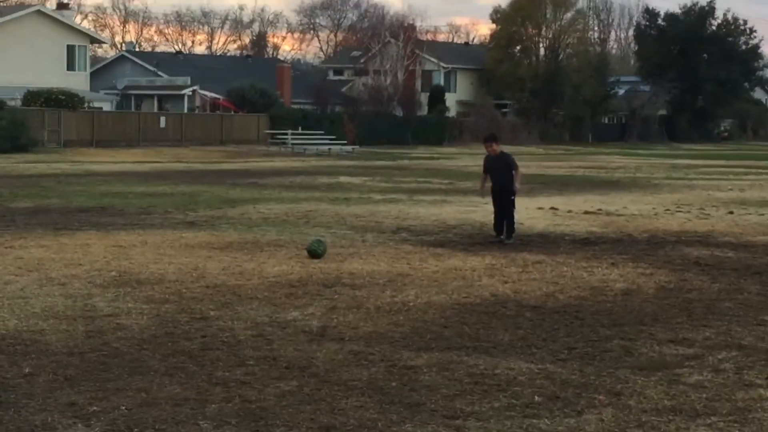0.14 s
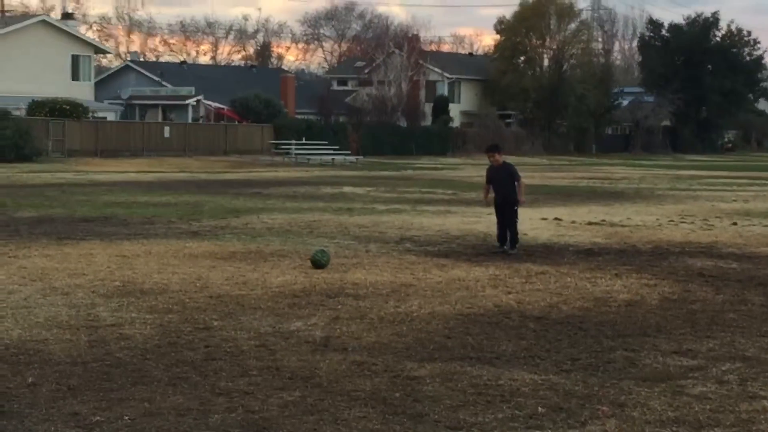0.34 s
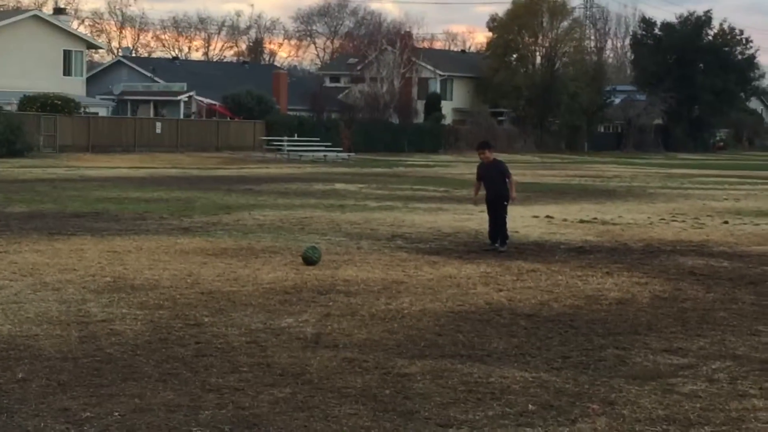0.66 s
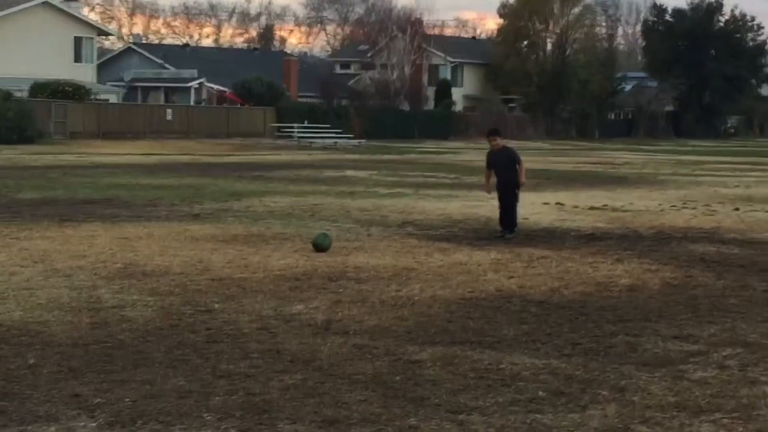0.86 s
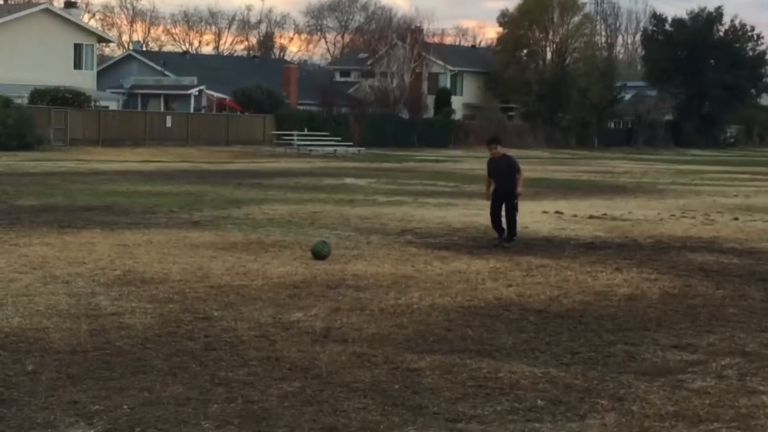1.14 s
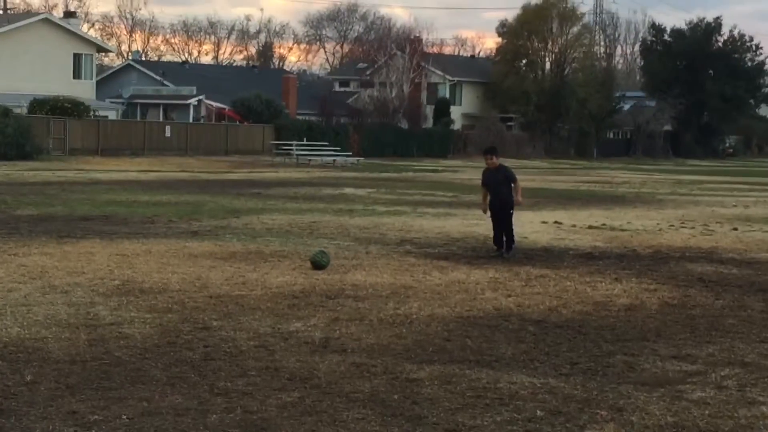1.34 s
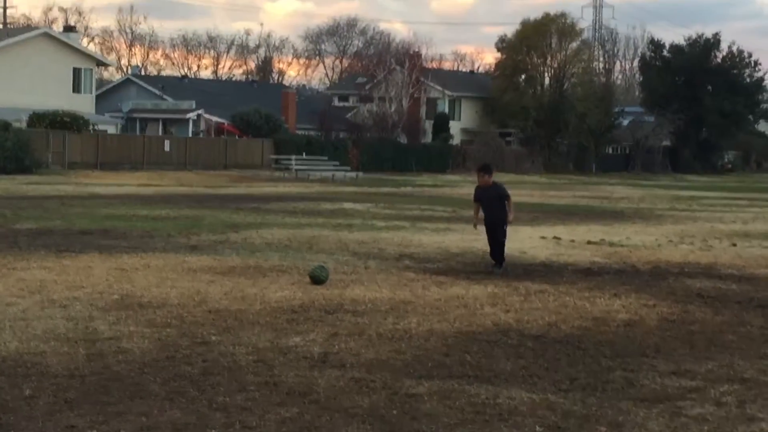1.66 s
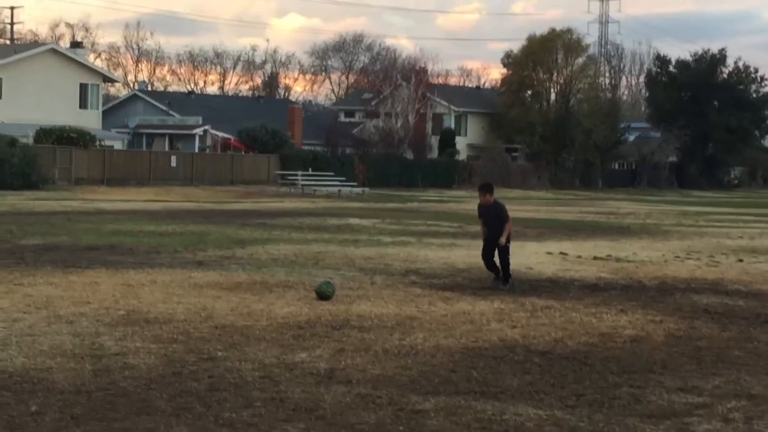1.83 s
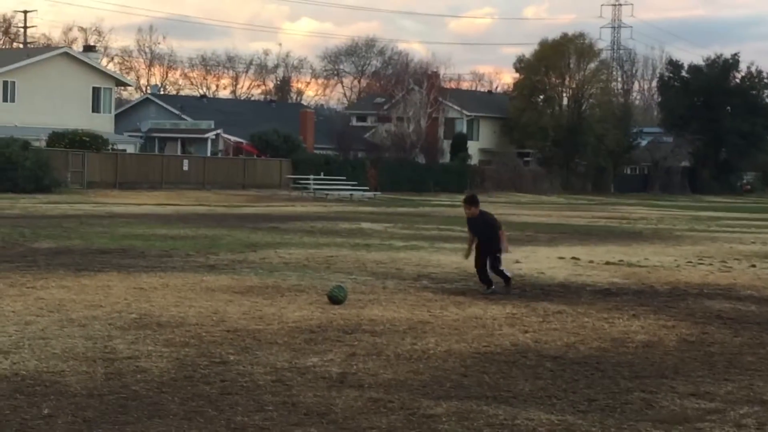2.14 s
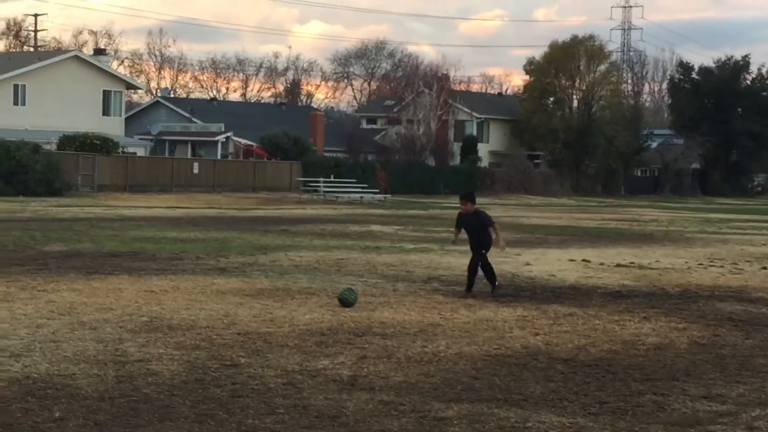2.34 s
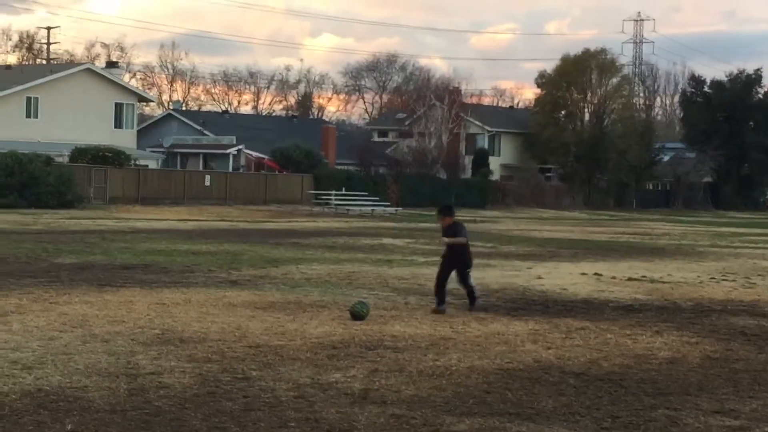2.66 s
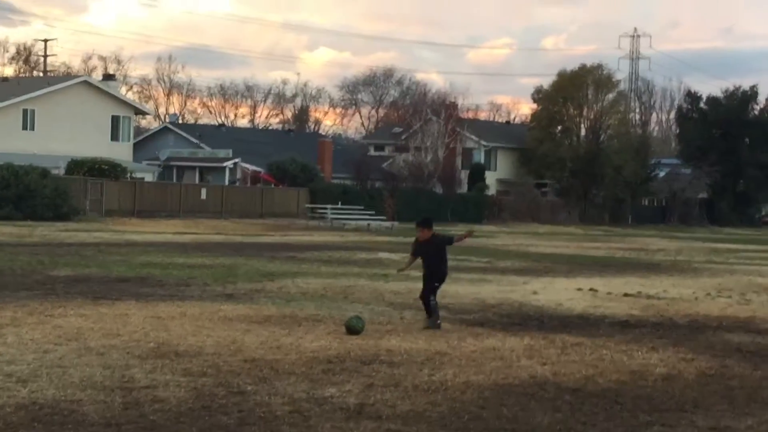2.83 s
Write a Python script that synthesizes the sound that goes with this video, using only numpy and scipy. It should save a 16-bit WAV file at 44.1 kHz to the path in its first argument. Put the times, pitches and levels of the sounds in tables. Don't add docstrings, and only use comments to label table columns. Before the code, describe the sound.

Unsteady mains hum and far-off road rumble outdoors, broken by a single bright crack and short rattle

```python
import sys
import numpy as np
from scipy import signal
from scipy.io import wavfile
from scipy.ndimage import uniform_filter1d

SR = 44100
rng = np.random.default_rng(int(sys.argv[2]) if len(sys.argv) > 2 else 0)


def natural_amplitude(level_db):
    exponent = np.asarray(level_db, float) / 20
    return 10 ** exponent


def pcm_store(signal):
    levels = np.round(np.clip(np.atleast_2d(signal), -1, 1) * 32767)
    wavfile.write(sys.argv[1], SR, levels.astype(np.int16).T)


N = 131859

# t/s, f/Hz, level/dB
HUM_PATH = [(0, 120.7, -34), (0.349, 120.3, -32), (0.387, 120.5, -36), (0.549, 120.1, -35),
            (.62, 121.2, -44), (.77, 118.5, -35), (0.871, 118.8, -45), (.94, 118.3, -34.5),
            (1.37, 120.3, -35.5), (1.419, 119.1, -42), (1.68, 121.5, -35), (1.82, 120.1, -54),
            (2.11, 119.7, -39.5), (2.199, 120.7, -42.5), (2.269, 121.8, -36), (2.57, 119.8, -31),
            (2.71, 119.5, -43.5), (2.745, 119.5, -39), (2.845, 119, -35), (2.885, 118, -66),
            (2.915, 119.6, -53), (2.95, 117.9, -42.5), (2.99, 116.2, -35)]
# t/s, level/dB
HUM_SECOND = [(0, -63.5), (.5, -58.5), (1.0, -57), (1.4, -56.5), (1.8, -81), (2.2, -54), (2.7, -58),
              (2.99, -62)]
# t/s, level/dB
HUM_THIRD = [(0, -77), (.77, -74.5), (.93, -84), (1.03, -62.5), (1.14, -80.5), (1.23, -64.5), (1.34, -81.5),
             (2.5, -84.5), (2.76, -66), (2.82, -81), (2.99, -70)]
# t/s, burst level/dB, spread/s, thump level/dB, ring level/dB
HIT_EVENTS = [
    (1.7500, -60, .002, -75, -62),
    (1.7521, -37, .0007, -38, -46),
    (1.7535, -51, 0.0058, -68, -50),
    (1.7605, -60, 0.00062, -54, -62),
    (1.792, -63, 0.0084, -70, -59),
    (1.841, -60, .007, -70, -57),
    (1.853, -70, .004, -75, -63),
    (1.887, -63, .009, -70, -61),
    (1.897, -70, .005, -75, -63),
]
# f/Hz, level/dB, t60/s
CRACK_MODES = [(2080, -8, .008), (2700, -9, .004), (3240, -4, .009), (3750, -5, .005), (4300, -3, .007),
               (5010, -3, .006), (5720, -1, .005), (6200, -2, .004), (6690, 0, .006), (7300, -2, .005),
               (7920, -6, .006), (9010, -11, .005), (12000, -26, .003)]
# f/Hz, level/dB, t60/s
THUMP_MODES = [(466, -2, 0.026), (600, 9, 0.014), (900, -25, 0.012), (1300, -5, .015)]
# f/Hz, level/dB, t60/s
RING_MODES = [(7080, 0, .032), (6680, -4, .025), (7500, -6, .025), (7900, -7, .025), (3240, -2, .025),
              (3660, -5, .02), (4290, -4, .022)]
# t/s, level/dB, rise/s, f/Hz
KNOCK_EVENTS = [
    (1.796, -57, .006, 570),
    (1.840, -55, .005, 420),
    (1.886, -50, .007, 470),
    (1.888, -56, .004, 590),
    (1.897, -57, .005, 490),
    (1.345, -56, .011, 1625),
]
# t/s, level/dB, spread/s, centre f/Hz, width/Hz
TICK_EVENTS = [(.2643, -49, .0016, 3450, 600), (.2688, -57, .0012, 3400, 900),
               (.2737, -57, .0016, 3600, 1100), (.2777, -60, .0012, 3500, 1200),
               (.6979, -48, .0009, 3750, 900), (.6976, -54, .0008, 2400, 900),
               (2.951, -63, .002, 3300, 900), (2.962, -63, .008, 3600, 1600),
               (2.9716, -48.5, .0012, 3250, 1200), (2.9718, -57, .001, 4200, 900),
               (2.9755, -59, .002, 3200, 700), (2.981, -64, .002, 3300, 700)]
# f/Hz, level/dB, t60/s
CASE_MODES = [(1900, -2, .006), (6050, 0, .005), (6950, -3, .006), (8100, -3, .004), (9300, -8, .004),
              (11100, -9, .004), (13300, -5, .005), (15200, -5, .005)]
# t/s, length/s, top f/Hz, level/dB
CHIP_EVENTS = [
    (.2575, .031, 5350, -63.5),
    (1.9315, .026, 5340, -63.5),
]
# t/s, length/s, start f/Hz, end f/Hz, level/dB
FAR_CALLS = [(.04, .07, 3650, 3450, -73), (.095, .085, 3600, 3350, -72.5), (.29, .06, 3500, 3800, -82),
             (.38, .07, 3900, 3900, -81), (1.205, .175, 1670, 1620, -68.5), (1.21, .09, 3700, 3500, -77),
             (1.24, .04, 5700, 5700, -81), (1.29, .04, 3720, 3680, -73), (1.33, .065, 3570, 3550, -72),
             (1.225, .04, 1650, 1550, -66), (1.255, .04, 1450, 1400, -69), (1.40, .05, 3400, 3300, -78)]
# f/Hz, level per Hz/dB
RUMBLE_SHAPE = [(24, -45.5), (45, -9.5), (72, 4), (105, 4.5), (200, -8), (300, -20.5), (420, -34.5),
                (700, -62.5)]
# f/Hz, level per Hz/dB
WASH_SHAPE = [(200, 1.5), (500, -4.5), (950, 0.5), (1700, -7), (2600, -15), (5000, -21.5), (10000, -25.5),
              (16000, -32)]
# t/s, level/dB
TRAFFIC_SWELL = [(0, 2.5), (.3, -1), (.55, 0.2), (.8, -0.5), (1.2, 0), (1.55, 0), (1.95, 1.5), (2.4, -1),
                 (2.75, 0.4), (2.88, -2.5), (2.99, 3)]

HUM_FUZZ, FUZZ_WIDTH = .15, 9
THUMP_LAG, SNAP_S = 0.00079, 0.003
SCUFF_DB = -9
TICK_WIDE_DB, TICK_CLEAN = -5, .75
CHIP_RISE, CHIP_FALL, CHIP_PEAK = .06, .1, .36
FAR_WIDTH = .09
RUMBLE_DB, WASH_DB = -42, -62
TYRE_HZ, TYRE_WANDER, TYRE_WIDTH, TYRE_DB = 930, .07, 150, -75.5
TOP_HZ, TOP_WIDTH, TOP_DB = 15450, 300, 4
DIP_HZ, DIP_WIDTH, DIP_DB = 10400, 400, -3


def evened(x):
    return x / np.sqrt(np.mean(x ** 2) + 1e-20)


def add(mix, s, sound):
    part = mix[round(s * SR):][:len(sound)]
    part += sound[:len(part)]


def resonate(x, hz, width):
    turn = np.exp(2j * np.pi * np.cumsum(hz * np.ones(len(x))) / SR)
    r = np.exp(-np.pi * width / SR)
    return 2 * (turn * signal.lfilter([1 - r], [1, -r], x / turn + 1e-18)).real


def twice(x, hz, width):
    return resonate(resonate(x, hz, width), hz, width)


def wander(t, rates):
    return np.array([np.sin(2 * np.pi * (f * t + rng.random())) for f in rates])


def hum():
    t = np.arange(N) / SR
    s, hz, db = np.transpose(HUM_PATH)
    hz = np.interp(t, s, hz)
    levels = [np.interp(t, s, db)]
    levels += [np.interp(t, *np.transpose(table)) for table in (HUM_SECOND, HUM_THIRD)]
    out = np.zeros(N)
    for k, level in enumerate(levels, 1):
        pitch = hz if k == 1 else k * np.median(hz) * np.ones(N)
        fuzz = evened(twice(rng.standard_normal(N), pitch, FUZZ_WIDTH))
        tone = np.sqrt(2) * np.cos(2 * np.pi * np.cumsum(pitch) / SR)
        share = HUM_FUZZ * k ** 2
        out += natural_amplitude(uniform_filter1d(level, size=900)) * (tone + share * fuzz) / np.hypot(1, share)
    return out


def puff(spread):
    u = np.arange(4000) / SR / spread
    return rng.standard_normal(len(u)) * u ** 2 * np.exp(-2.5 * u)


def modes(drive, table):
    t = np.arange(len(drive)) / SR
    body = np.zeros(len(t))
    for k, (hz, db, t60) in enumerate(table):
        body += (-1) ** k * natural_amplitude(db - 60 * t / t60) * np.sin(2 * np.pi * hz * t)
    out = signal.fftconvolve(drive, body)[:len(t)]
    return out / abs(out).max()


def hit(start, burst_db, spread, thump_db, ring_db):
    burst = puff(spread)
    i = np.arange(len(burst))
    snappy = np.exp(-spread / SNAP_S)
    clicks = np.isin(i, np.round(spread * SR * np.array([.2, 1.3])))
    burst = burst / np.linalg.norm(burst) + snappy * clicks
    push = np.exp(-((i / SR - THUMP_LAG - spread / 2) / 0.000088) ** 2)
    crack = natural_amplitude(burst_db) * modes(uniform_filter1d(burst, size=2), CRACK_MODES)
    thump = natural_amplitude(thump_db) * modes(push, THUMP_MODES)
    scuff = natural_amplitude(burst_db + SCUFF_DB) * (1 - snappy) ** 2 * burst / abs(burst).max()
    ring = natural_amplitude(ring_db) * modes(burst, RING_MODES)
    return start, crack - thump + scuff + ring


def knock(start, db, rise, hz):
    t = np.arange(4000) / SR
    out = (t / rise) ** 2 * np.exp(-2.5 * t / rise) * np.sin(2 * np.pi * hz * t)
    return start, natural_amplitude(db) * out / abs(out).max()


def tick(start, db, spread, hz, width):
    burst = puff(spread)
    u = np.arange(4000) / SR / spread
    rough = twice(burst, hz, width)
    tone = u * np.exp(-1.7 * u) * np.sin(2 * np.pi * hz * spread * u)
    click = np.arange(4000) == round(.3 * spread * SR)
    snap = click + .5 * burst / np.linalg.norm(burst)
    out = TICK_CLEAN * tone / abs(tone).max() + (1 - TICK_CLEAN) * rough / abs(rough).max()
    return start, natural_amplitude(db) * (out + natural_amplitude(TICK_WIDE_DB) * modes(snap, CASE_MODES))


def chip(start, length, top_hz, db):
    u = np.arange(0, length, 1 / SR) / length
    rise = CHIP_RISE * (1 - u / CHIP_PEAK) ** 2
    fall = CHIP_FALL * ((u - CHIP_PEAK) / (1 - CHIP_PEAK)) ** 2
    hz = top_hz * (1 - np.where(u < CHIP_PEAK, rise, fall))
    swell = np.sin(np.pi * u ** .7) ** 1.2
    return start, natural_amplitude(db) * swell * np.sin(2 * np.pi * np.cumsum(hz) / SR)


def far_call(start, length, from_hz, to_hz, db):
    u = np.arange(0, length, 1 / SR) / length
    hz = from_hz + (to_hz - from_hz) * u
    whistle = evened(twice(rng.standard_normal(len(u)), hz, FAR_WIDTH * from_hz))
    return start, natural_amplitude(db) * np.sqrt(np.sin(np.pi * u)) * whistle


def air(shape, patchy_db, swell_db, size):
    hop = size // 4
    frames, hz = N // hop + 5, np.fft.rfftfreq(size, 1 / SR)
    a, b, patches = rng.standard_normal((frames, len(hz), 3)).T
    patches = uniform_filter1d(uniform_filter1d(patches, size=12, axis=0), size=12, axis=1)
    rates = np.geomspace(.3, 4, num=20)
    swell = evened((1 / np.sqrt(rates)) @ wander(np.arange(frames) * hop / SR, rates))
    f, level = np.transpose(shape)
    colour = np.interp(np.log(hz + 1), np.log(f), level)
    colour += TOP_DB * np.exp(-((hz - TOP_HZ) / TOP_WIDTH) ** 2)
    colour += DIP_DB * np.exp(-((hz - DIP_HZ) / DIP_WIDTH) ** 2)
    z = (a + 1j * b) * natural_amplitude(colour[:, None] + patchy_db * evened(patches) + swell_db * swell)
    return evened(signal.istft(z, nperseg=size, noverlap=size - hop)[1][:N])


def rumble():
    passing_db = np.interp(np.arange(N) / SR, *np.transpose(TRAFFIC_SWELL))
    return natural_amplitude(RUMBLE_DB + passing_db) * air(RUMBLE_SHAPE, patchy_db=0.27, swell_db=-0.08, size=4096)


def wash():
    return natural_amplitude(WASH_DB) * air(WASH_SHAPE, patchy_db=1.92, swell_db=0.3, size=1024)


def tyres():
    drift = evened(wander(np.arange(N) / SR, np.geomspace(.5, 6, num=12)).sum(0))
    hz = TYRE_HZ * (1 + TYRE_WANDER * drift)
    return natural_amplitude(TYRE_DB) * evened(twice(rng.standard_normal(N), hz, TYRE_WIDTH))


def scene():
    mix = hum() + rumble() + wash() + tyres()
    events = ((HIT_EVENTS, hit), (KNOCK_EVENTS, knock), (TICK_EVENTS, tick),
              (CHIP_EVENTS, chip), (FAR_CALLS, far_call))
    for table, source in events:
        for row in table:
            add(mix, *source(*row))
    return mix[None]


def top_cut(x):
    return signal.sosfilt(signal.butter(12, 15760, fs=SR, output="sos"), x)


def record(dry):
    return top_cut(dry)


dry = scene()
out = record(dry)
pcm_store(out)
```